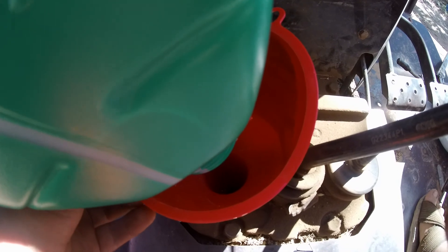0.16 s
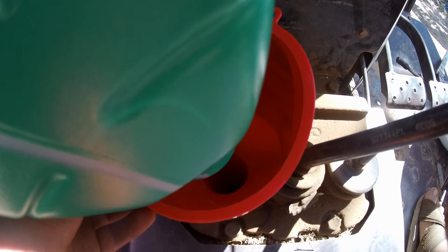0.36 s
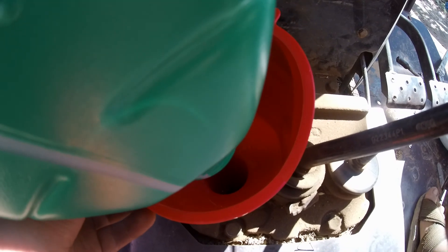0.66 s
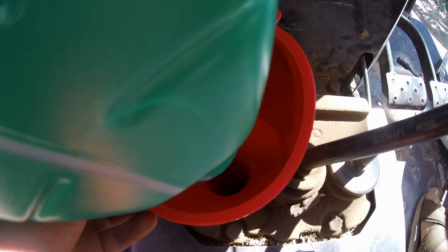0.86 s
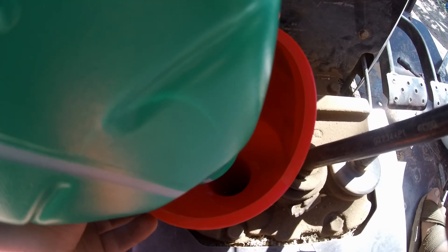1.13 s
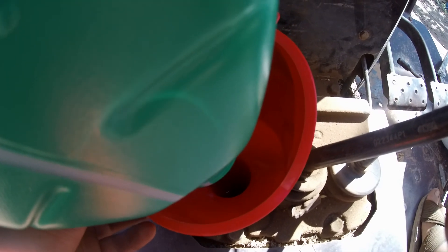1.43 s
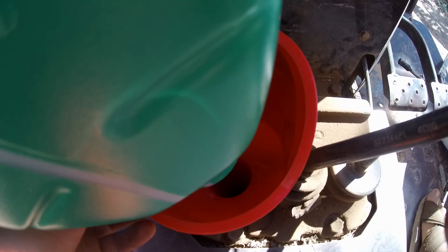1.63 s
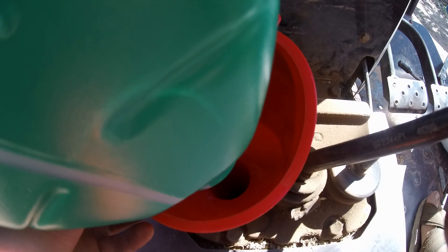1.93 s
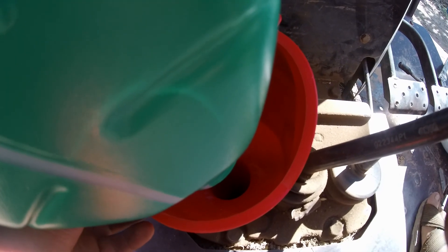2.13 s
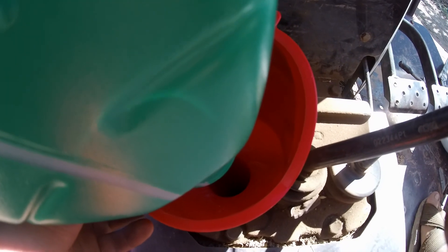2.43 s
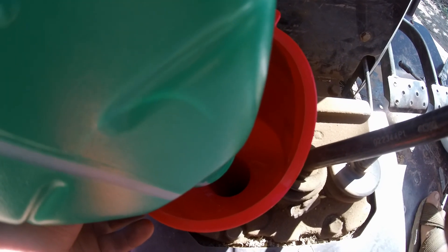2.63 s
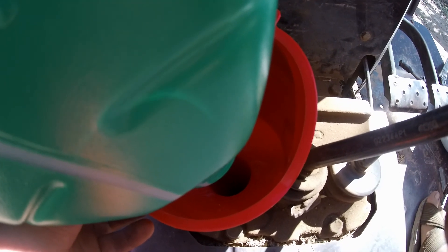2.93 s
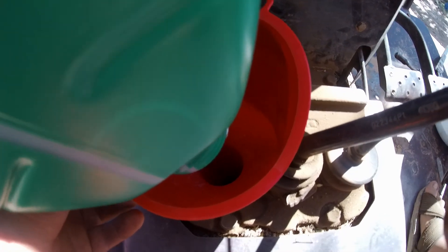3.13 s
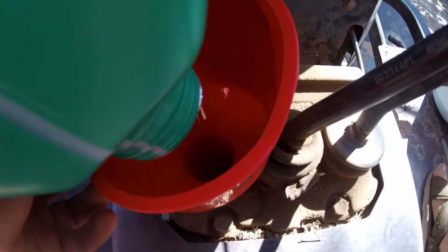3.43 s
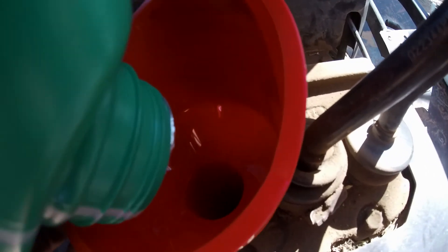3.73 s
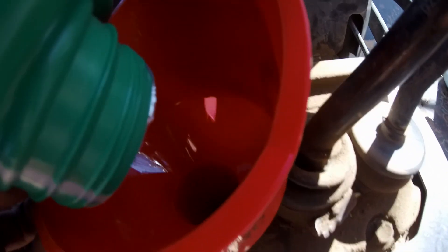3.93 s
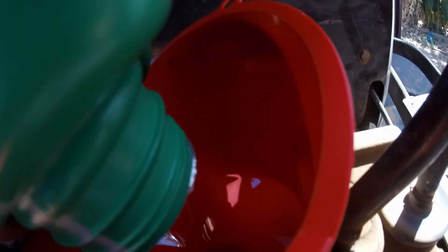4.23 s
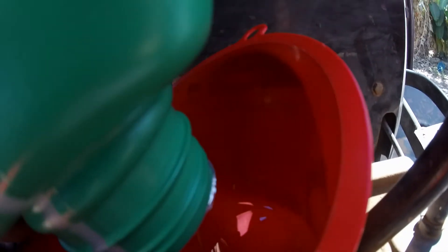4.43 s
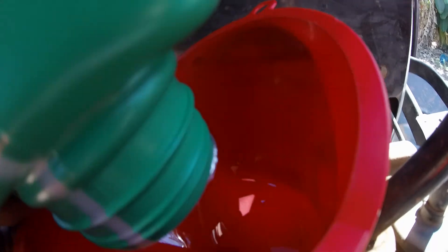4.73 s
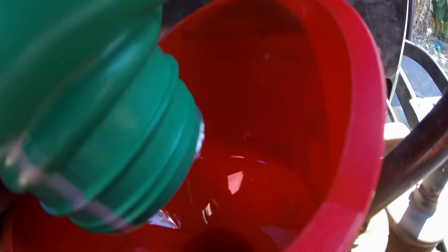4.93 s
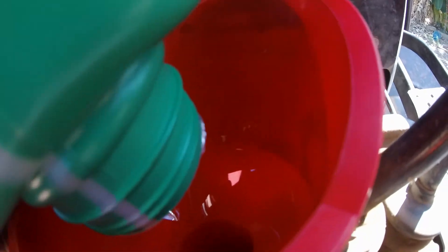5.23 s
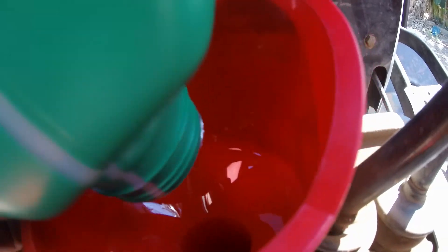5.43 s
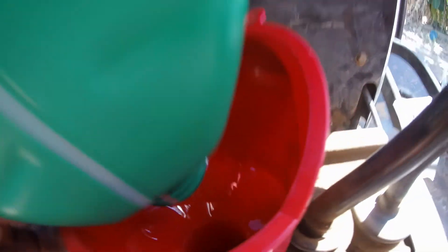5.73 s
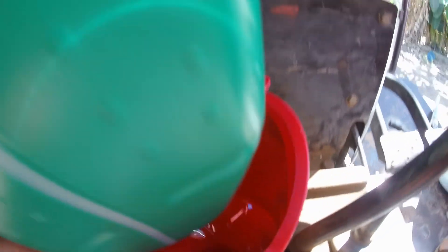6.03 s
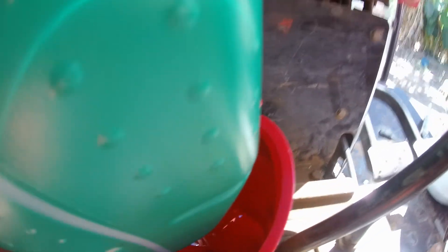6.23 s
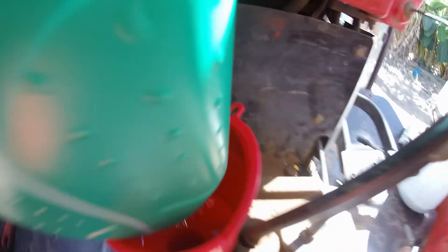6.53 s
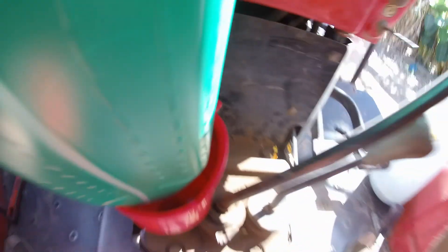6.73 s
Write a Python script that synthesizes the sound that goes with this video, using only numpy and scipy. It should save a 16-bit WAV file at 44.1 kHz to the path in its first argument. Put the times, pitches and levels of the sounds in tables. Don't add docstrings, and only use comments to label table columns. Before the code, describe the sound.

Outdoors beside a machine, hands shift a jug over a funnel. After an early clatter the scene stays nearly still, with soft taps over deep, dull air noise. Later come heavy hollow thuds, sharp rim clacks, plastic rubbing and fingertip ticks, some blows shaking the metal frame in a low hum. Finally the upended jug scrapes and rattles in the funnel. Heard close, with short dull echoes.

```python
import sys
import numpy as np
from scipy import signal
from scipy.fft import rfft, irfft
from scipy.io import wavfile
from scipy.ndimage import uniform_filter1d

SR = 44100
rng = np.random.default_rng(int(sys.argv[2]) if len(sys.argv) > 2 else 0)


def boost_factor(decibels):
    exponent = np.asarray(decibels, float) / 20
    return 10 ** exponent


def store_wav(level_fs):
    pcm = np.round(np.clip(np.atleast_2d(level_fs), -1, 1) * 32767)
    wavfile.write(sys.argv[1], SR, pcm.T.astype(np.int16))


N = 302967


def rms_one(x):
    return x / np.sqrt(np.mean(x ** 2) + 1e-20)


def in_time(rows):
    s, *columns = np.transpose(rows)
    return [np.interp(np.arange(N) / SR, s, c) for c in columns]


def band(x, low_hz, high_hz):
    sos = signal.butter(2, [low_hz, min(high_hz, .45 * SR)], "band", fs=SR, output="sos")
    return signal.sosfilt(sos, x)


def drift(rate_hz):
    count = int(rate_hz * N / SR) + 3
    return np.interp(np.linspace(0, count - 1, N), np.arange(count), rng.standard_normal(count))


def coloured(spectrum):
    hz, db = np.transpose(spectrum)
    grid_hz = np.fft.rfftfreq(N, 1 / SR) + 1e-3
    gain = boost_factor(np.interp(np.log(grid_hz), np.log(hz), db))
    return rms_one(irfft(rfft(rng.standard_normal(N)) * gain, N))


def ring(force, hz, t60):
    r, w = boost_factor(-60 / (t60 * SR)), 2 * np.pi * hz / SR
    return signal.lfilter([0, np.sin(w)], [1, -2 * r * np.cos(w), r * r], force + 1e-18)


def grains(per_s, spread_db):
    sizes = boost_factor(spread_db * np.minimum(rng.exponential(1, N), 5)) * rng.choice([-1, 1], N)
    return sizes * (rng.random(N) < per_s / SR)


def scraped(modes, per_s, spread_db, damping):
    slips = grains(per_s, spread_db)
    out = np.zeros(N)
    for k, (hz, db, t60) in enumerate(modes):
        out += (-1) ** k * boost_factor(db) * ring(slips, hz, t60 * damping)
    return rms_one(out)


def struck(modes, rows_s, levels_db, pitches_hz, shares, focus_db, turns, scatter_db):
    hz, db, t60 = np.transpose(modes)[:, :, None]
    t = np.arange(int(1.5 * t60.max() * SR)) / SR
    side = (-1.0) ** np.arange(len(modes))[:, None]
    rise = np.sin(np.pi / 2 * np.minimum(t * hz / turns, 1)) ** 2
    luck = rng.standard_normal((len(rows_s), len(modes), 1))
    out = np.zeros(N + len(t))
    for s, level_db, pitch_hz, share, strength in zip(rows_s, levels_db, pitches_hz, shares, luck):
        off_db = focus_db * np.minimum(np.abs(np.log2(hz / pitch_hz)), 1.1)
        mode_db = level_db + db - off_db + scatter_db * strength
        fade = boost_factor(mode_db - 60 * t / (t60 * np.clip(share, .05, 1.5)))
        out[int(s * SR):][:len(t)] += np.sum(side * rise * fade * np.sin(2 * np.pi * hz * t), axis=0)
    return out[:N]


def crack(rows_s, levels_db, t60, low_hz, high_hz, rise_ms=0.1):
    force = np.zeros(N)
    force[(rows_s * SR).astype(int)] = boost_factor(levels_db)
    fade = signal.lfilter([1], [1, -boost_factor(-60 / (t60 * SR))], force + 1e-18)
    swell = np.exp(-1000 / (rise_ms * SR))
    noise = rms_one(band(rng.standard_normal(N), low_hz, high_hz))
    return signal.lfilter([1 - swell], [1, -swell], fade) * noise


def while_running(runs):
    t = np.arange(N) / SR
    return uniform_filter1d(sum((t > start) & (t < end) for start, end in runs).astype(float), size=400)


def strokes(start, end, levels_db, rise_db_per_s, fall_db_per_s):
    t = np.arange(0, N, 32)[:, None] / SR
    db = levels_db - rise_db_per_s * np.maximum(start - t, 0) - fall_db_per_s * np.maximum(t - end, 0)
    return np.interp(np.arange(N) / SR, t[:, 0], boost_factor(db).sum(axis=1))


def tones(lines):
    t = np.arange(N) / SR
    return sum(np.sqrt(2) * boost_factor(db) * np.sin(2 * np.pi * hz * t) for hz, db in lines)


# (frequency [Hz], density [dB])
AIR = [(15, -63), (25, -7), (49, 1), (96, 0.5), (240, -5.5), (359, -7), (495, -14), (552, -16),
       (631, -12.5), (804, -14.5), (1620, -21.5), (9550, -23.5), (12500, -19), (15500, -30)]


def air():
    return boost_factor(-53) * coloured(AIR)


# (frequency [Hz], level [dB rms])
WHINE = [(12225, -74), (11068, -86), (14212, -88)]
# (frequency [Hz], level [dB rms])
FOCUS = [(5864, -71), (10996, -74), (11727, -81), (14666, -84)]
# (start [s], end [s])
FOCUS_RUNS = [
    (.565, 1.0),
    (4.09, 4.17),
    (4.62, 4.68),
    (5.4, 5.79),
]
# (frequency [Hz], level [dB rms])
SETTLE = [(4662, -75)]
# (start [s], end [s])
SETTLE_RUNS = [
    (1.0, 1.68),
    (2.4, 2.62),
]


def camera():
    motor = while_running(FOCUS_RUNS) * tones(FOCUS) + while_running(SETTLE_RUNS) * tones(SETTLE)
    return tones(WHINE) + motor


# (frequency [Hz], level [dB], t60 [s])
BELLY = [(122, -1.0, .2), (173, 0.0, .14), (190, -8.0, .2), (222, -5.0, .1), (295, -3.0, .1),
         (330, -2.0, .12)]
# (frequency [Hz], level [dB], t60 [s])
CONE = [(415, 5, 0.047), (454, -2.5, 0.14), (528, 1, 0.045), (603, -0.5, 0.073), (685.3, 3, 0.074),
        (774, 4, 0.068), (776, 0.5, 0.13)]
# (time [s], rumble level [dB])
GRIP = [(0, -50), (.36, -66), (.42, -35.5), (.69, -41), (1.2, -50), (2.7, -61), (3.8, -46.5), (4.24, -45.5),
        (4.36, -47.5), (4.8, -52.5), (5.09, -39), (5.32, -33), (5.5, -46.5), (5.96, -45.5), (6.05, -34),
        (6.4, -35.5), (6.66, -31.5), (6.87, -41)]


def grip_rumble(grip_db):
    rumble = scraped(BELLY + CONE[:3], per_s=400.0, spread_db=3.0, damping=0.47)
    return boost_factor(grip_db - 7.0) * rumble


# (frequency [Hz], level [dB], t60 [s])
SPOUT = [(583, -35, 0.056), (670, 12, 0.054), (742, 2, 0.079), (802, 1, 0.12), (874, -1, 0.028),
         (1012, -5, 0.021), (1160, 14.5, 0.00099)]
# (start [s], end [s], level [dB])
DRAGS = [(0.433, 0.472, -44), (.5, 0.686, -56), (3.703, 3.8, -59), (4.06, 4.207, -50), (4.258, 4.27, -42.5),
         (4.424, 4.852, -52.5), (4.935, 4.98, -41), (5.086, 5.098, -33), (5.192, 5.468, -39.5),
         (5.65, 5.754, -57), (6.27, 6.327, -42), (6.57, 6.794, -45)]


def spout_scrape(grip_db):
    rub = boost_factor(-65.5 + 0.81 * (grip_db + 49))
    drags = strokes(*np.transpose(DRAGS), rise_db_per_s=410, fall_db_per_s=354)
    return boost_factor(-4.0) * (rub + drags) * scraped(SPOUT, per_s=1500.0, spread_db=1.5, damping=1)


# (time [s], cone level [dB], cone pitch [Hz], belly level [dB], belly pitch [Hz])
KNOCKS = [(.392, -25.5, 640, -33, 267), (.403, -26, 640, -41, 167), (.413, -44, 450, -31.5, 171),
          (.425, -30.5, 414, -34.5, 173), (4.129, -31, 730, -26, 270), (4.137, -37, 696, -23.5, 236),
          (4.148, -33, 470, -33, 173), (4.189, -46, 630, -30.5, 180), (4.275, -35.5, 560, -28, 228),
          (4.283, -47, 680, -32.5, 234), (4.291, -55, 645, -43, 121), (5.187, -30, 670, -37, 173),
          (5.258, -24.5, 735, -30, 94), (5.266, -36, 740, -37, 200), (5.278, -35, 382, -31.5, 217),
          (5.669, -29.5, 700, -25, 330), (5.685, -44, 694, -22.5, 165), (5.9615, -29, 617, -34, 334),
          (5.9669, -27, 460, -14, 176), (5.973, -40, 450, -30.5, 122), (5.99, -37, 730, -31.5, 173),
          (6.033, -26, 670, -31, 350), (6.048, -33, 670, -50, 350), (6.055, -32, 415, -36, 173),
          (6.318, -36, 401, -48, 114), (6.667, -42, 390, -26, 280), (6.682, -37, 590, -34.5, 340),
          (6.697, -45, 593, -34.5, 298), (6.708, -43, 593, -42, 300), (6.31, -39, 450, -40, 122),
          (.44, -40, 540, -49, 192), (.455, -29, 415, -41, 173)]
# (time [s], cone
# level [dB], cone pitch [Hz], belly level [dB], ring share [0-1])
LIGHT_TAPS = [(.049, -37, 694, -24, 0.09), (.247, -35, 401, -44, 0.23), (.917, -42.5, 610, -57, 1),
              (1.103, -43.5, 614, -51, 0.68), (1.413, -36.5, 600, -47, 0.63), (1.558, -27, 800, -33, 0.23),
              (1.748, -38.5, 760, -39.5, 0.4), (1.762, -43, 760, -50, 0.24), (2.402, -36, 560, -66, 0.33),
              (3.047, -7.5, 403, 2, 0.06), (3.71, -40, 606, -48, 0.23), (3.745, -32.5, 610, -51, 0.61),
              (3.948, -26.5, 584, -65, 0.43), (4.37, -35, 574, -38.5, 0.3), (4.765, -37, 705, -38, 0.26),
              (4.841, -41, 820, -55, 1), (4.959, -46, 700, -43, 0.3), (5.067, -40, 675, -61, 1),
              (5.081, -31, 685, -58, 1), (5.092, -28.5, 680, -46, 0.9), (5.1, -23, 670, -44, 0.75),
              (5.11, -27, 700, -39, 0.6), (5.122, -50, 670, -46, 0.6), (5.159, -49, 680, -52, 0.4),
              (5.299, -39, 664, -54, 0.5), (6.087, -33, 410, -50, 0.7), (6.1, -30, 412, -45, 1),
              (6.17, -28, 514, -54, 1), (6.226, -27.5, 492, -53, 0.9)]
# (time [s], cone level [dB], cone pitch [Hz], belly level [dB], ring share [0-1])
SHOULDER_TAPS = [(1.301, -30, 523, -25.5, 0.13), (1.322, -26.5, 490, -35, 0.16),
                 (2.945, -31.5, 415, -43, 0.28), (3.076, -15.5, 437, -13, 0.09), (3.101, -47, 441, -56, 0),
                 (3.303, -28, 820, -34, 0.21), (3.318, -33, 630, -46, 0.2), (3.353, -36, 436, -33.5, 0.23),
                 (3.674, -31, 407, -41, 0.26), (3.896, -39, 680, -42, 0.37), (4.163, -23, 655, -18, 0.25),
                 (4.167, -8.5, 595, -27, 0.26), (4.172, -7, 483, -16, 0.32),
                 (4.2345, -14, 494, -21.5, 0.16), (6.301, -18.5, 515, -24, 0.33)]
KNOCK_RING = 0.98
LIGHT_HZ, SHOULDER_HZ = 113, 350


def body_blows():
    rows = [(*row, KNOCK_RING) for row in KNOCKS]
    for taps, belly_hz in (LIGHT_TAPS, LIGHT_HZ), (SHOULDER_TAPS, SHOULDER_HZ):
        rows += [(s, db, hz, belly_db, belly_hz, share) for s, db, hz, belly_db, share in taps]
    return rows


def body_knocks():
    s, cone_db, cone_hz, belly_db, belly_hz, share = np.transpose(body_blows())
    belly = struck(BELLY, s, belly_db + 8.5, belly_hz, share, focus_db=22.0, turns=1.1, scatter_db=1.5)
    cone = struck(CONE, s, cone_db, cone_hz, share, focus_db=20.0, turns=1.36, scatter_db=2.0)
    return belly + cone


# (frequency [Hz], level [dB], t60 [s])
FRAME = [(63.4, 1.5, 0.19), (94, 9, 0.064)]
# (time [s], level [dB], ring share [0-1])
JOLTS = [
    (0.051, -34.5, 0.33),
    (3.047, -33.5, 0.74),
    (4.128, -28, 0.86),
    (4.175, -34, 0.57),
    (5.109, -32, 0.56),
    (5.198, -32, 0.5),
    (5.673, -37, 0.7),
    (5.986, -34, 1),
    (6.3, -34, 0.8),
]


def frame_jolts():
    s, level_db, share = np.transpose(JOLTS)
    pitch_hz = np.full_like(s, 75.0)
    return struck(FRAME, s, level_db - 0.5, pitch_hz, share, focus_db=-8.0, turns=0.29, scatter_db=1.5)


def yard(x, t60=.35, wet_db=-11.0):
    t = np.arange(SR // 2) / SR
    echoes = rng.standard_normal(len(t)) * boost_factor(-60 * t / t60) * (t > .006)
    wet = signal.oaconvolve(x, echoes / np.linalg.norm(echoes))[:N]
    return boost_factor(wet_db) * band(wet, 120, 1800)


# (start [s], end [s], rim scrape level [dB], skin hiss level [dB])
SLIDING = [(.17, 0.18, -73, -57.5), (3.52, 4.143, -60, -66), (4.147, 4.29, -50, -63),
           (4.405, 4.695, -59.5, -64.5), (4.81, 4.895, -59, -58), (4.942, 5.046, -54, -57),
           (5.099, 5.135, -46.5, -53.5), (5.253, 5.347, -46, -56.5), (5.37, 5.397, -48.5, -57),
           (5.421, 5.432, -44.5, -52), (5.447, 5.468, -49, -52), (5.487, 5.53, -61, -67),
           (5.614, 5.95, -57.5, -63.5), (6.082, 6.143, -49, -52.5), (6.185, 6.247, -45.5, -51),
           (6.27, 6.336, -45.5, -48), (6.37, 6.467, -44, -62), (6.502, 6.52, -40, -37),
           (6.548, 6.596, -37, -37), (6.63, 6.657, -45, -35.5), (6.672, 6.678, -49, -44),
           (6.703, 6.764, -45, -58), (6.79, 6.87, -47, -51.5)]
# (time [s], rim scrape level [dB], skin hiss level [dB])
SCUFFS = [
    (3.72, -50, -61),
    (4.23, -56, -53),
    (4.37, -70, -75),
    (5.19, -42, -50),
    (5.276, -62, -46),
    (5.68, -58, -55),
    (5.972, -44, -46),
    (6.036, -27, -32.5),
    (5.855, -49, -69),
    (6.305, -54, -60),
]
# (frequency [Hz], density [dB])
SKIN = [(1470, -61), (2980, -36), (3390, -5.5), (7220, 1), (11000, 11.5), (13200, 13.5), (14700, 3.5),
        (15500, 9)]
# (frequency [Hz], level [dB], t60 [s])
RIDGES = [(2680, 0, .04), (3100, -3, .03), (3520, -4, .04), (4200, -6, .035), (5110, -7, .03)]
# (start [s], end [s])
RIDGE_RUNS = [
    (5.09, 5.13),
    (5.28, 5.465),
]


def finger_slides():
    start, end, *slide_db = np.transpose(SLIDING)
    s, *scuff_db = np.transpose(SCUFFS)
    on_rim, on_skin = (strokes(start, end, long_db, rise_db_per_s=308, fall_db_per_s=475)
                       + strokes(s, s, short_db, rise_db_per_s=1800, fall_db_per_s=1000)
                       for long_db, short_db in zip(slide_db, scuff_db))
    rim = rms_one(band(grains(6000.0, 2.5), 1800, 7000))
    ridge_gain = .25 + .65 * while_running(RIDGE_RUNS)
    rim += ridge_gain * scraped(RIDGES, per_s=900.0, spread_db=3.0, damping=1)
    rim *= boost_factor(1.5 * drift(60.0))
    skin = coloured(SKIN) * boost_factor(2.0 * drift(250.0) + 1.5 * drift(60.0))
    return boost_factor(-9.5) * on_rim * rim + boost_factor(3.0) * on_skin * skin


# (time [s], level [dB], top part level [dB], top pitch [Hz])
CLACKS = [(0.3927, -29.5, -25.5, 2770), (0.3952, -36, -34.5, 2830), (0.412, -32, -38, 2450),
          (5.992, -49, -56, 2300), (1.408, -44, -74, 2270), (.913, -47, -75, 2400), (1.301, -52, -75, 2400),
          (1.322, -58, -75, 2400), (1.559, -57, -75, 2400), (1.75, -50, -70, 2400), (1.763, -57, -70, 2400),
          (3.126, -52, -72, 2400), (3.305, -50, -72, 2400), (3.393, -53, -70, 2400),
          (3.953, -59, -58, 2700), (0.426, -44, -44, 2450), (6.05, -44, -44, 2600), (6.058, -42, -46, 2400),
          (3.0437, -46, -62, 3320), (3.319, -49, -71, 2400), (3.6201, -46.5, -58, 3670),
          (3.746, -39.5, -53, 2840), (3.896, -46, -67, 3040), (3.9483, -37, -59, 2700),
          (4.129, -36, -46, 2500), (4.14, -42, -53, 2600), (4.226, -62, -52, 2900), (4.163, -38, -55, 2110),
          (4.176, -56, -59, 2550), (4.233, -39, -55, 3120), (4.276, -42, -62, 2830),
          (4.3676, -48, -67, 2090), (5.097, -39, -53, 2510), (5.185, -38, -54, 4210),
          (5.26, -42, -58, 3960), (5.67, -40.5, -54, 2750), (5.964, -31, -52, 2250),
          (6.0282, -29.5, -24, 2930), (6.033, -29, -24, 4260), (6.19, -52, -55, 3370),
          (6.238, -37, -55, 2450), (6.3026, -43, -55, 4330)]
# (frequency [Hz], level [dB], t60 [s])
RIM = [(948, -2, 0.05), (1080, -4, 0.03), (1195, -1, 0.055), (1393, -3, 0.03), (1545, -4, 0.07),
       (1685, -5, 0.08), (1900, -6, .05)]
# (frequency [Hz], level [dB], t60 [s])
RIM_TOP = [(2309, -6, .09), (2412, 0, .14), (2606, -4, .1), (2830, 0, .07), (3050, -3, .07),
           (3200, -3, .05), (3400, -4, .07), (3585, -3, .05), (3780, -3, .045), (4075, -5, .05),
           (4310, -1, .045), (4650, -5, .03)]
CLACK_HZ, CLACK_RING, RING_LOSS_PER_DB = 980, .75, .004
RIM_SCATTER_DB = 2.5


def rim_clacks():
    s, level_db, top_db, top_hz = np.transpose(CLACKS)
    rim_hz = np.full_like(s, CLACK_HZ)
    share = CLACK_RING - RING_LOSS_PER_DB * (level_db + 40)
    out = struck(RIM, s, level_db - 0.5, rim_hz, share, focus_db=14.5, turns=1.06, scatter_db=RIM_SCATTER_DB)
    out += struck(RIM_TOP, s, top_db - 9.0, top_hz, share, focus_db=10.0, turns=2.9,
                  scatter_db=RIM_SCATTER_DB)
    out += crack(s, top_db - 12.5, 0.052, 1500, 24000, rise_ms=0.31)
    return out + crack(s, level_db - 15.5, 0.15, 530, 1840, rise_ms=0.57)


# (time [s], level [dB])
SHUDDERS = [
    (.45, -36),
    (5.72, -53),
    (6.02, -37.5),
]


def shudder():
    s, level_db = np.transpose(SHUDDERS)
    wall = scraped(BELLY[1:3], per_s=720.0, spread_db=-0.5, damping=0.95)
    return wall * strokes(s, s, level_db, rise_db_per_s=504, fall_db_per_s=51)


# (time [s], peak level [dB], dull part level re peak [dB])
TICKS = [(2.2287, -44, -36), (3.047, -44.5, -36), (3.391, -47, -16), (3.496, -35.5, -42),
         (3.5897, -43, -29), (3.62, -34.5, -28), (3.6463, -44, -12.5), (3.7145, -32, -19),
         (3.7384, -40, -19), (3.894, -44, -30), (3.898, -47, -30), (3.901, -46, -30), (3.598, -45, -30),
         (3.7188, -46, -25), (3.985, -46, -25), (4.022, -44, -18), (4.029, -43, -23), (5.1025, -40, -20),
         (5.3245, -46, -25), (6.4717, -43, -30), (6.488, -33, -32), (3.9497, -51.5, -2.5),
         (4.009, -37, -18), (4.0378, -37, -17), (4.137, -37.5, -22), (4.1592, -43.5, -7),
         (4.2095, -39, -15), (4.2344, -39.5, -8), (4.3132, -40, -20), (4.371, -44, -5.5), (4.197, -51, -10),
         (4.216, -41, -25), (4.224, -48, -13), (4.252, -46, -15), (4.27, -45, -13), (4.4463, -38.5, -22),
         (5.184, -34.5, -22.5), (5.2666, -31.5, -27), (5.677, -43, -15), (5.969, -43, -17)]
# (time [s], level [dB], low edge [Hz], high edge [Hz])
SQUEAK = (1.725, -63.0, 5100, 5700)


def ticks():
    s, peak_db, dull_db = np.transpose(TICKS)
    snaps = crack(s, peak_db - 0.5, 0.0079, 4700, 20000)
    snaps += crack(s, peak_db + dull_db + 11.5, 0.011, 540, 4400)
    s, db, low_hz, high_hz = SQUEAK
    slips_s = s + np.array([0, .012, .025])
    return snaps + crack(slips_s, np.full(3, db), .08, low_hz, high_hz, rise_ms=5.0)


# (start [s], end [s], level [dB])
HUM = [
    (4.161, 4.26, -35.5),
    (4.632, 4.68, -60.5),
    (5.066, 5.128, -54.5),
    (5.258, 5.29, -43.5),
]


def hum():
    hz = FRAME[0][0] + 1.5 * drift(9.0)
    swing = np.sqrt(2) * np.sin(2 * np.pi * np.cumsum(hz) / SR)
    return swing * boost_factor(7.0) * strokes(*np.transpose(HUM), rise_db_per_s=304, fall_db_per_s=88)


# (frequency [Hz], level [dB], t60 [s])
TAB = [(945, 0, .065), (1010, -3, .05), (1195, -3, .075), (1440, -8, .04), (1600, -9, .05),
       (1690, -14, .17), (1745, -21, .1), (2000, -11, .04), (2420, -10, .04), (3320, -15, .04),
       (3440, -16, .04), (7170, -14, .045)]
# (time [s], level [dB])
PINGS = [
    (6.17, -27.5),
    (6.177, -34),
    (6.22, -30),
    (6.227, -26.5),
]


def tab():
    s, level_db = np.transpose(PINGS)
    free = np.ones_like(s)
    modes = struck(TAB, s, level_db, TAB[0][0] * free, free, focus_db=0, turns=4.0, scatter_db=1.5)
    body = crack(s, level_db - 13.0, .07, 630, 2100, rise_ms=2.5)
    return modes + body + crack(s, level_db - 18.0, 0.1, 5030, 12900, rise_ms=1.0)


# (frequency [Hz], level [dB], t60 [s])
NECK = [(540, -11, 0.06), (595, 0.5, 0.082), (685, -8.5, 0.044), (1026, -13.5, 0.054), (1204, -11.5, 0.03),
        (1272, -5, 0.02), (1640, -14.5, 0.024), (1920, -25, 0.0087)]
# (time [s], level [dB])
RATTLE = [(6.4264, -27.5), (6.4436, -26.5), (6.476, -31), (6.522, -24.5), (6.559, -23.5), (6.575, -41),
          (6.591, -26), (6.627, -24.5), (6.641, -30), (6.655, -40), (6.669, -30), (6.737, -37),
          (6.762, -31), (6.776, -49), (6.7954, -27), (6.808, -47), (6.828, -52), (6.456, -34), (6.535, -42),
          (6.398, -43)]


def rattle():
    s, level_db = np.transpose(RATTLE)
    free = np.ones_like(s)
    neck = struck(NECK, s, level_db, NECK[0][0] * free, free, focus_db=0, turns=2.4, scatter_db=2.0)
    return neck + crack(s, level_db - 13.5, 0.08, 640, 1180, rise_ms=1.2)


def scene():
    grip_db, = in_time(GRIP)
    hits = body_knocks() + frame_jolts() + rim_clacks() + tab() + rattle()
    hands = grip_rumble(grip_db) + spout_scrape(grip_db) + finger_slides() + ticks()
    return (air() + camera() + hands + hits + yard(hits) + shudder() + hum())[None]


def roll_off(x):
    return signal.sosfilt(signal.butter(12, 16350, fs=SR, output="sos"), x)


def record(dry):
    x = signal.sosfilt(signal.butter(2, 30, "high", fs=SR, output="sos"), dry)
    x = signal.sosfilt(signal.ellip(10, 1, 50, 15400, fs=SR, output="sos"), x)
    return roll_off(x)


dry = scene()
out = record(dry)
store_wav(out)
```